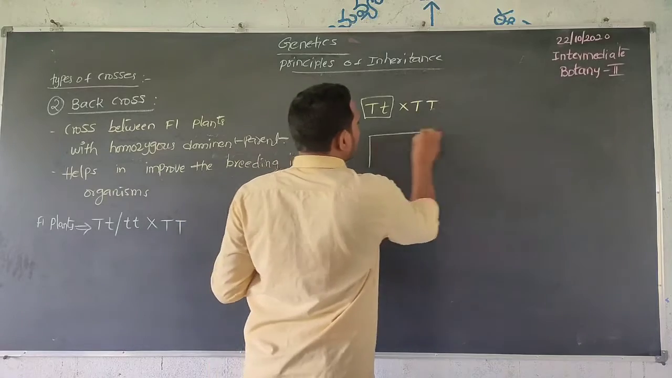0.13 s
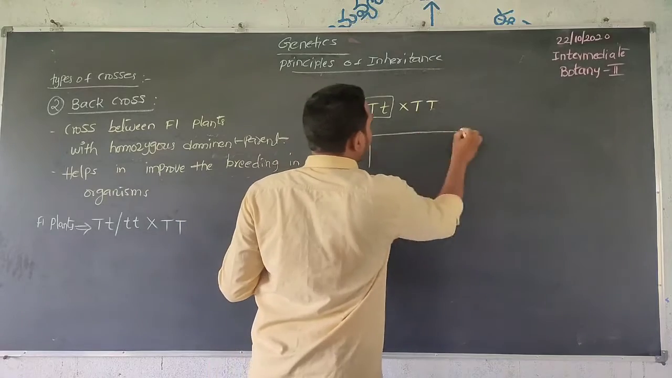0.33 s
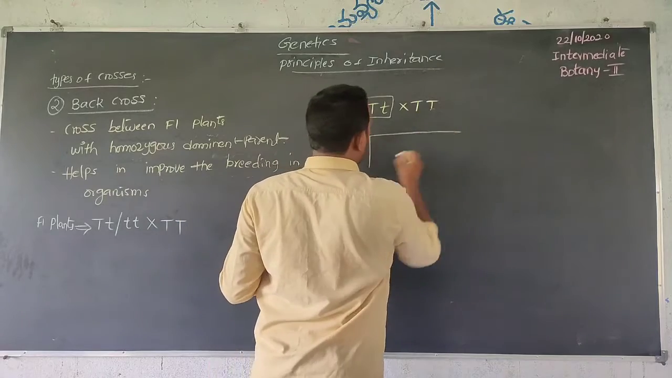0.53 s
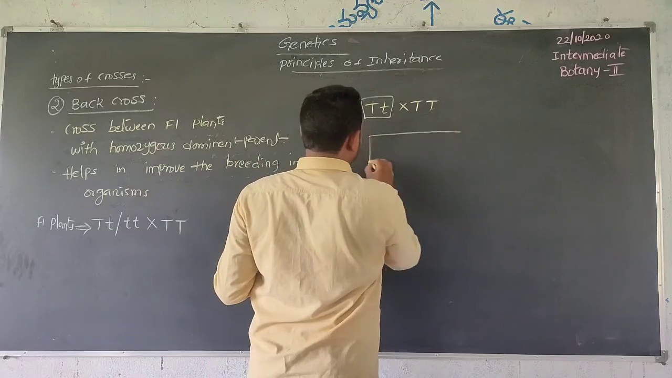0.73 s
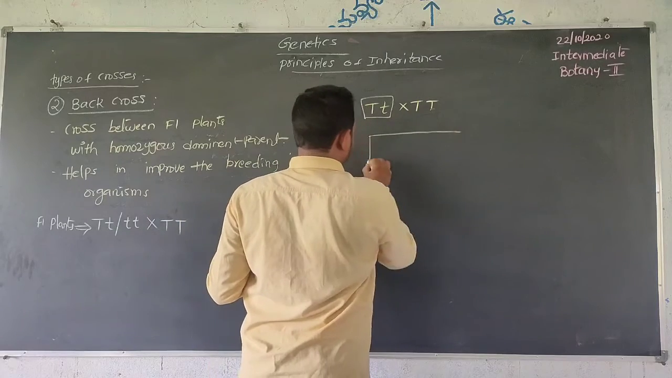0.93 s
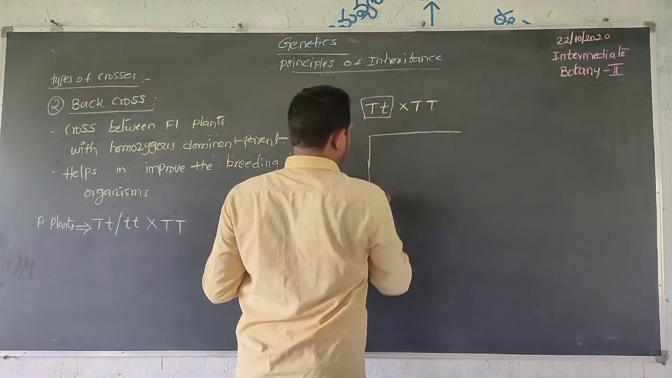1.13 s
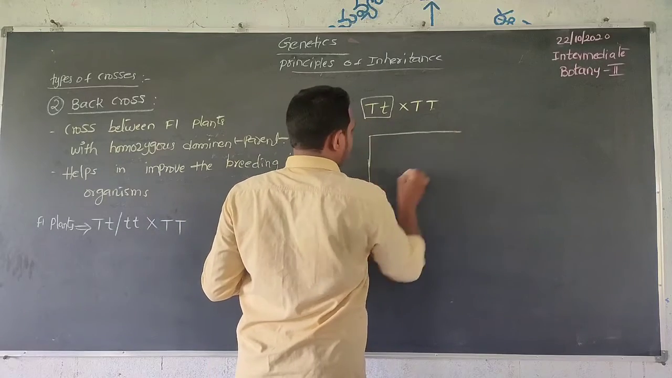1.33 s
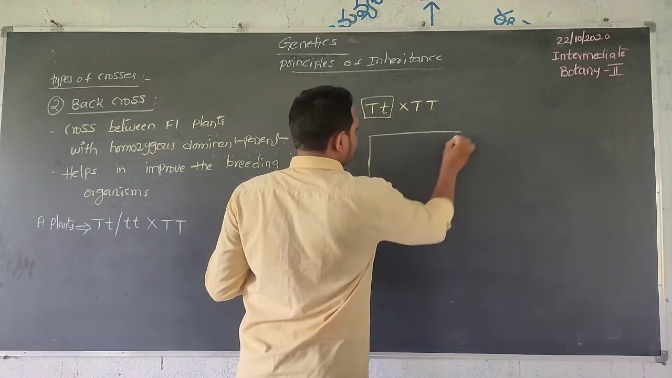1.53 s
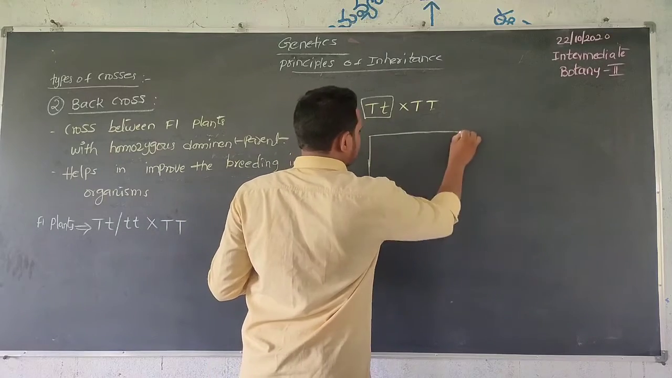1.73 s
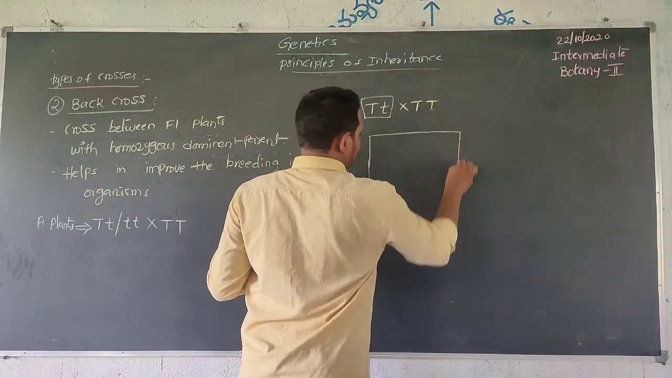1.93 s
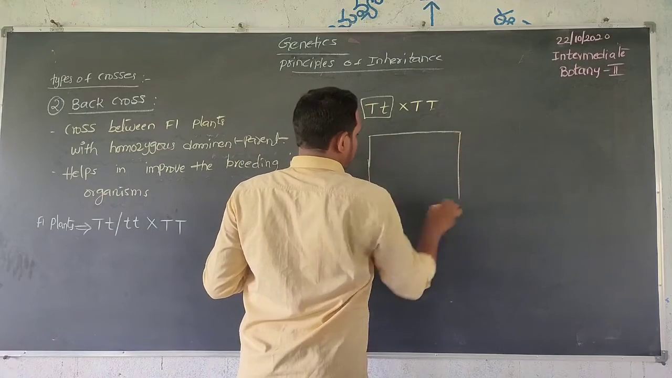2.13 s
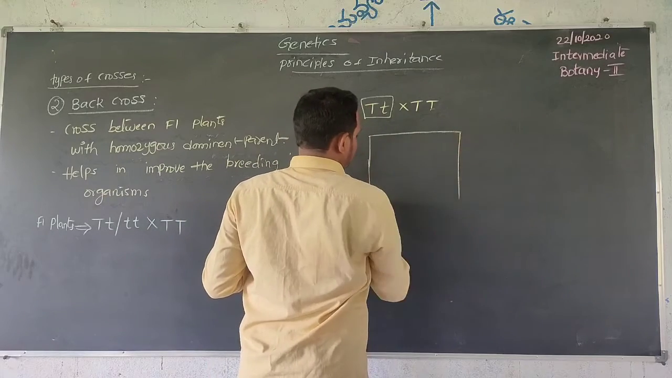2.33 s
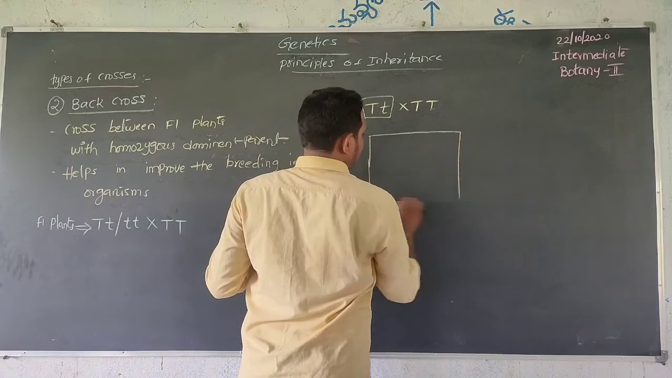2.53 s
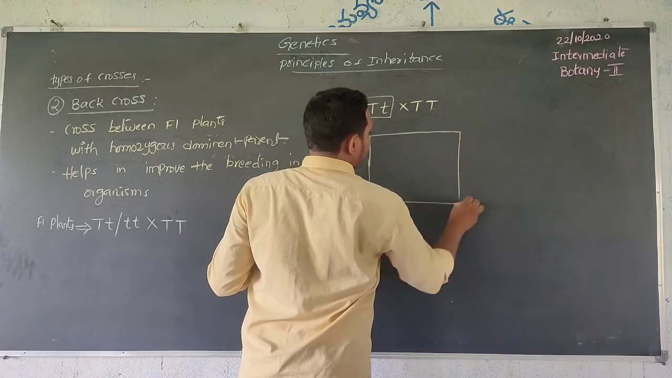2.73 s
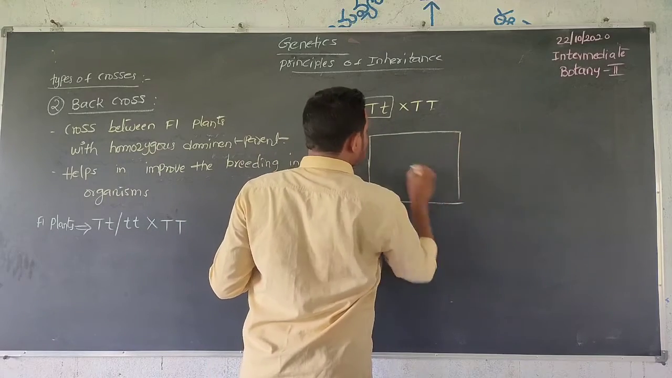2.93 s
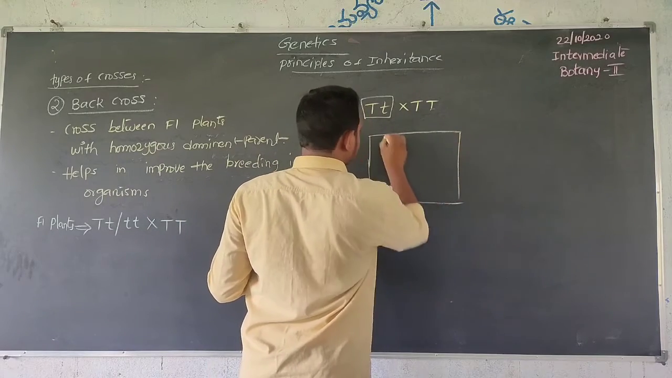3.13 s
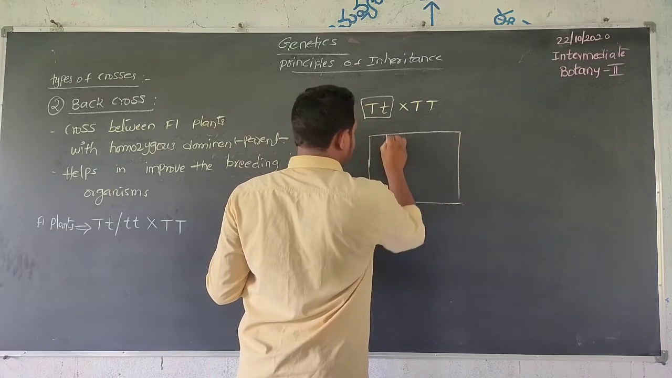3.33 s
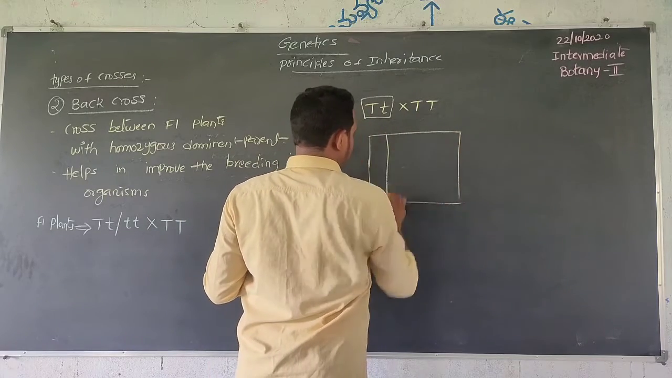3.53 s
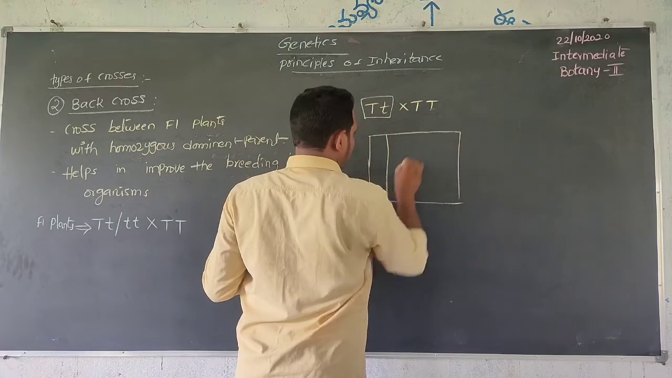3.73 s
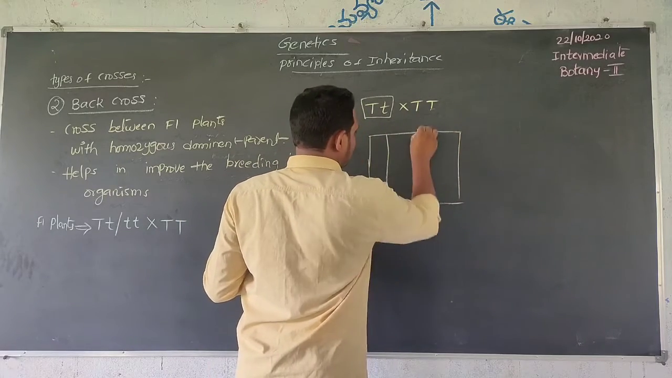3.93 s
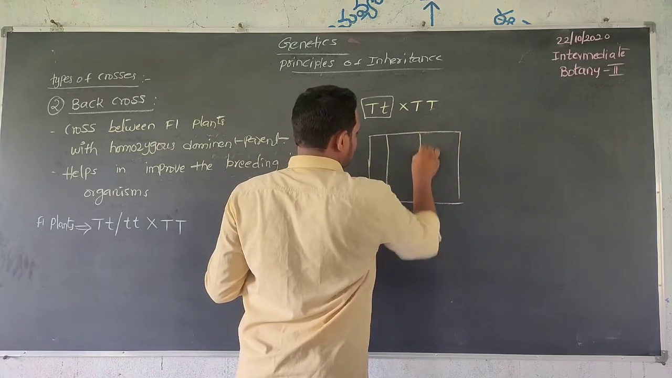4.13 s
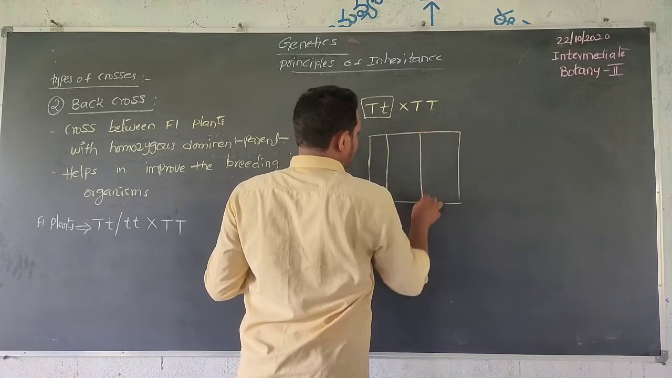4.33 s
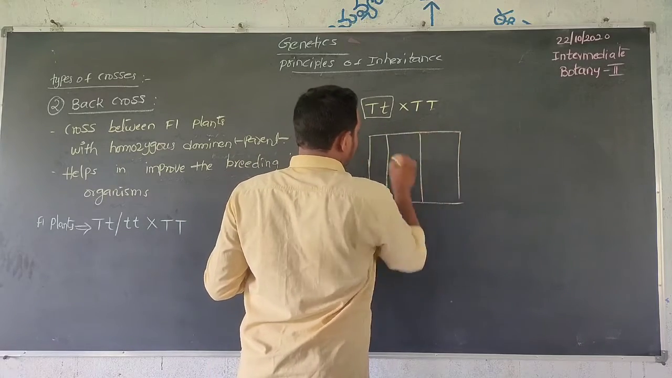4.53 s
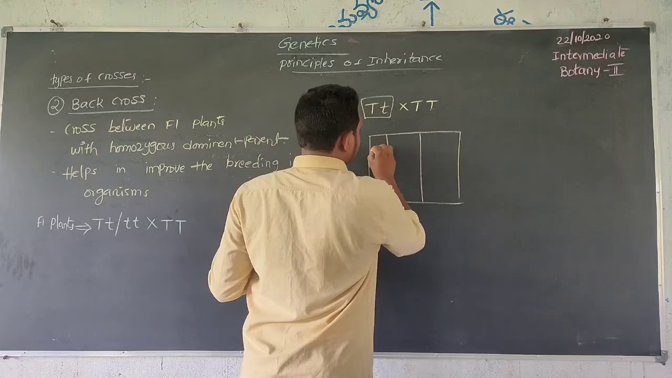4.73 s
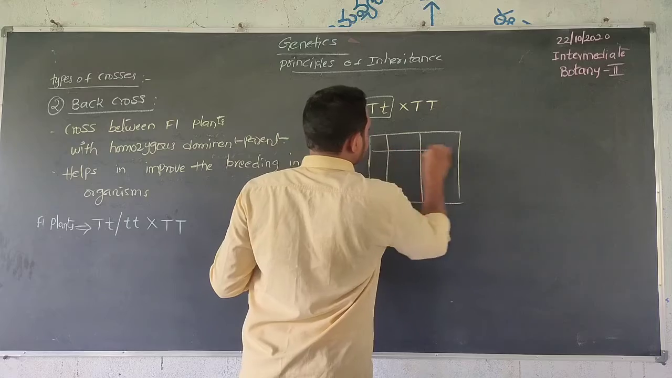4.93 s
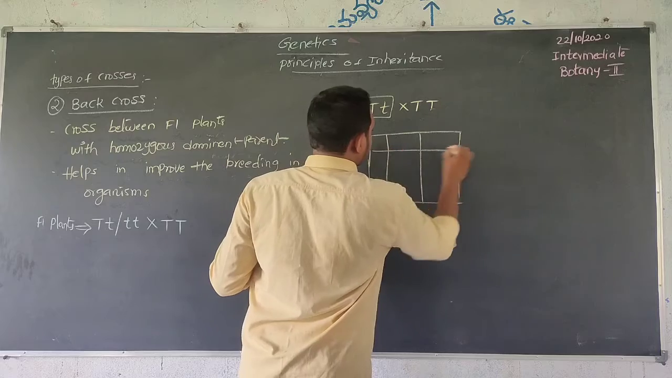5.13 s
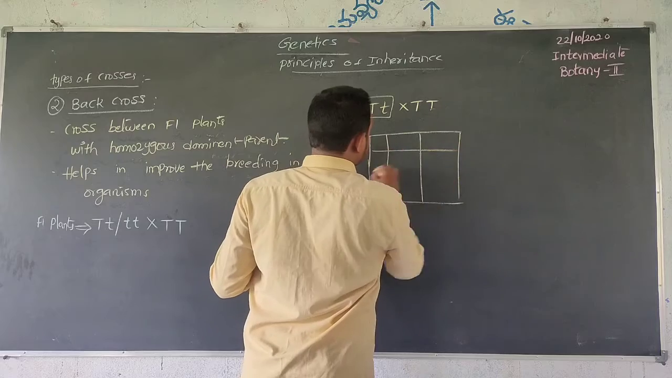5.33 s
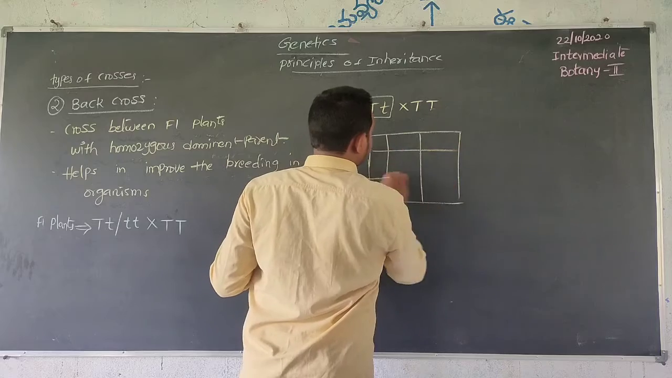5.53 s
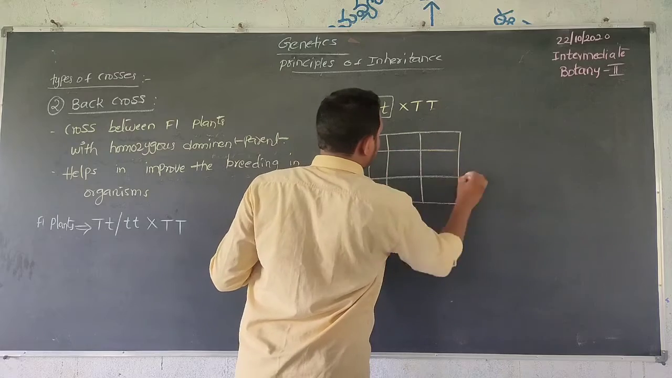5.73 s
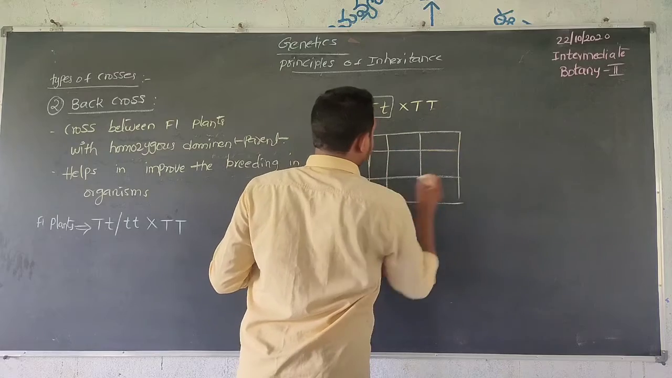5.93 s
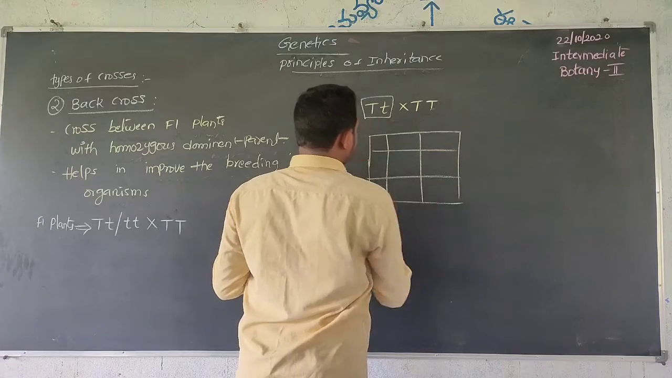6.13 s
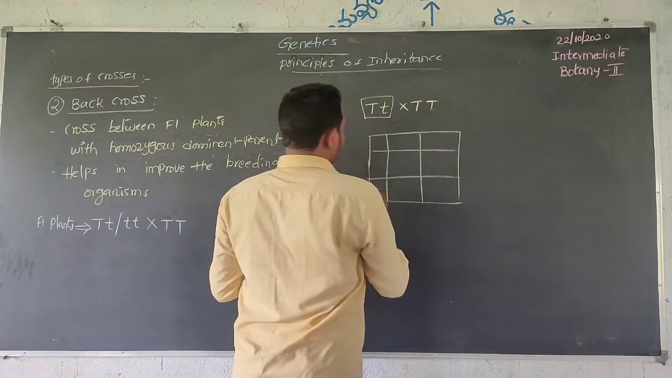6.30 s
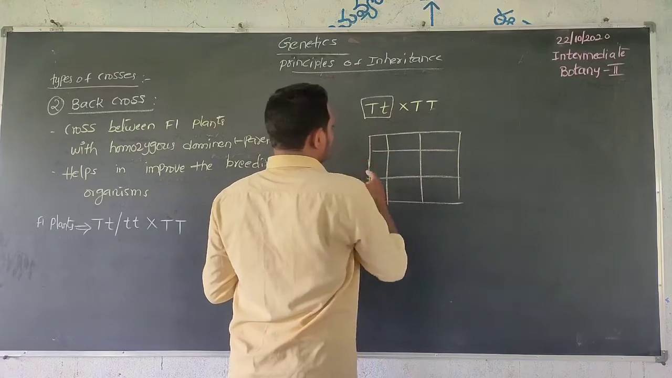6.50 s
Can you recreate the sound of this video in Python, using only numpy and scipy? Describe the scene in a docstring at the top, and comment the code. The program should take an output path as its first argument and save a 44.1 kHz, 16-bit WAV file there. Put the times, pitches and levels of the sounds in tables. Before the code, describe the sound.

In a bare, echoing classroom with a faint drone of distant traffic, a chalk stick taps a blackboard and scrapes along it, nine times with brief pauses between. The dry, dusty strokes ring slightly, shake the board and sometimes stutter into a rasp. Taps and scrapes grow louder after the first few, and the tip ends with a soft brush. It is all heard through a single microphone.

```python
"""A faint room ring of chalk fades at the very start. A chalk stick taps a wall blackboard and is dragged
along nine ruled lines, most set down with a tap. In each line its grit hisses, rings the stick at a
pitch that follows the grip and shakes the board; now and then the stick catches and judders. The later
lines are louder, and a light brush of the tip comes last. All along, a bare classroom echoes and far
traffic drones, heard by one microphone."""
import sys
import numpy as np
from scipy import signal
from scipy.fft import rfft, irfft, next_fast_len
from scipy.io import wavfile
from scipy.ndimage import uniform_filter1d, map_coordinates

SR = 44100
rng = np.random.default_rng(int(sys.argv[2]) if len(sys.argv) > 2 else 0)


def dump(signal):
    """Clip the signal to [-1, 1] and save it as 16-bit WAV at the path in sys.argv[1]."""
    limited = np.clip(np.atleast_2d(signal).T, -1, 1)
    pcm = np.round(limited * 32767).astype(np.int16)
    wavfile.write(sys.argv[1], SR, pcm)


N = 289457


def strokes():
    """Dragged chalk: one grit sounds as dust hiss, scrape and the stick's two rings; the board thrums."""
    # spectrum of the dust hiss: (frequency [Hz], level [dB])
    dust_eq = [(1500, -9), (3100, -0.5), (6500, -3), (8900, -7), (11000, 1), (13000, 0.5), (15700, -7.5)]
    # spectrum of the scrape through the board: (frequency [Hz], level [dB])
    scrape_eq = [(200, -26), (450, 9), (800, -9.5), (1440, 10), (2400, 5.5), (4000, -39)]

    def resonance(hz, s, name, trim_db, width_hz):
        centre_hz = control(name + "_hz", s, lifted_db=None)
        return amp(control(name, s) + trim_db) * hump(hz, centre_hz, width_hz)

    def tip_colour(hz, s):
        low_ring = resonance(hz, s, "low_ring", trim_db=-6.5, width_hz=1270)
        high_ring = resonance(hz, s, "high_ring", trim_db=-4.5, width_hz=2870)
        panel = resonance(hz, s, "scrape", trim_db=-7, width_hz=700)  # the patch of board under the tip
        sizzle = amp(control("sizzle", s)) * hump(hz, centre_hz=14850, width_hz=1500)
        return low_ring + high_ring + panel + sizzle

    t = np.arange(N) / SR
    crumbs = grit(spread_db=12.5, density=.03)
    hiss = coloured(crumbs, dust_eq) * amp(control("hiss", t))
    scrape = coloured(crumbs, scrape_eq) * amp(control("scrape", t) - 12)
    push = rng.standard_normal(N) * amp(control("thrum", t) + 14.5 + wobble(rate_hz=14, depth_db=3))
    tip = shaped(crumbs, tip_colour, patchy_db=2.5)
    rubbing = shaped(hiss + scrape, lambda hz, s: 1, patchy_db=3.3)
    unsteady_hand = amp(wobble(rate_hz=18, depth_db=1.5))
    return rubbing + tip * unsteady_hand + filtered(push, board)


def grit(spread_db, density):
    """Crumbs of chalk break off: steady rubbing with scattered, somewhat larger grains."""
    grains = (rng.random(N) < density) * amp(spread_db * rng.random(N))
    return unit((1 + grains) * rng.standard_normal(N))


def ruled_lines():
    """Breakpoints for each line: speed drives the hiss, pressure the scrape, grip the ring pitch."""
    # one gesture a line: (time [s], hiss [dB], relative scrape [dB], low ring pitch [Hz],
    # low ring offset from hiss [dB], high ring offset from hiss [dB])
    gestures = [
        [(0.15, -76, -65, 3470, 10, 8), (0.182, -66.5, -49, 4900, 6, 19), (0.24, -58, -40, 4800, 17, 15),
         (0.304, -56, -42.5, 4870, -1, 16.5), (0.394, -54.5, -43.5, 4800, -3, 16),
         (0.436, -52.5, -41, 3770, 12, 5), (0.508, -61, -50, 4700, -1, 17), (0.545, -68, -55, 4120, 14, 11)],
        [(1.11, -81, -40, 2850, 18, 8), (1.126, -66, -51, 2940, 13, 6), (1.186, -54.5, -59, 2800, 6, -4),
         (1.222, -50.5, -46, 3100, 5.5, -3), (1.346, -48.5, -58, 3060, 4, -3), (1.382, -50.5, -64, 3030, 9, -3),
         (1.41, -60, -52, 2840, 15, 1), (1.425, -70, -58, 2830, 15, 9)],
        [(1.657, -67, -51, 3940, 13, 12), (1.667, -56, -49, 4130, 6, 0), (1.691, -55.5, -40.5, 5000, 10, 9),
         (1.719, -60.5, -42, 5030, 2, 7), (1.757, -64, -43.5, 3940, 16, 7), (1.831, -74, -65, 4350, 13, -1),
         (1.885, -80, -64, 4160, 20, 2), (1.95, -91, -64, 4160, 16, 8)],
        [(1.99, -66, -66, 3960, 11, 1), (2.01, -65, -65, 3910, 18, 7), (2.044, -62, -60, 3800, 24, 6),
         (2.118, -57, -45, 4120, 13.5, 11.5), (2.184, -54, -49, 4430, 10, 13.5),
         (2.236, -53, -47.5, 4330, 8, 10), (2.276, -53.5, -36, 3720, 17.5, 12), (2.29, -72, -34, 3680, 18, 8)],
        [(2.645, -61, -36, 2700, 21, 3), (2.655, -56, -50, 2690, 10, -1), (2.695, -47, -50, 2950, 7, -9),
         (2.727, -47.5, -29, 3170, 11.5, 2), (2.789, -45.5, -32.5, 3660, -1, 7),
         (2.827, -47.5, -44.5, 3120, 18.5, 10), (2.951, -58, -45, 3730, 12, 15), (2.98, -73, -56, 3320, 18, 7)],
        [(3.49, -66, -40.5, 4100, 16, 11), (3.518, -61.5, -51, 5200, 7, 11), (3.602, -49, -46, 4800, 9.5, -13),
         (3.646, -52, -48, 4380, 4, 10), (3.73, -46, -49, 3080, 11.5, -0.5), (3.788, -52, -60, 3310, 10.5, 3),
         (3.822, -52, -44, 3660, 11, 5), (3.825, -69, -50, 3580, 10, 6)],
        [(4.23, -85, -50, 4730, 18, 17), (4.26, -63, -49, 4400, 9, 12), (4.368, -50, -51, 4300, 6, 2),
         (4.42, -48.5, -50, 3930, 15.5, 7), (4.472, -48, -45, 4400, 6.5, 6), (4.51, -52.5, -58, 3220, 12, 4),
         (4.534, -46.5, -47, 3270, 14, -3), (4.548, -63, -34.5, 3170, 15, 8)],
        [(4.99, -67, -44, 3300, 11, -1), (5.028, -54, -50, 4240, -3, 7), (5.058, -53, -33, 4330, 13, 5),
         (5.104, -47.5, -37, 4410, -4, 4), (5.144, -51.5, -39.5, 4600, 14, 9),
         (5.216, -49.5, -45, 3840, -6, 13), (5.258, -63.5, -45, 3980, 23, 20), (5.27, -51, -47, 3920, 9, 2)],
        [(5.675, -59, -31, 2700, 10, 1), (5.691, -53, -44, 2800, 0, -6), (5.755, -42.5, -42, 2700, 15, -11),
         (5.789, -44.5, -33, 3620, 2, 0), (5.825, -41.5, -36, 4370, 2, 4.5),
         (5.895, -51.5, -36, 3980, 11.5, 15.5), (5.941, -54, -40.5, 3870, 1, 15),
         (5.96, -68, -39, 4020, 15, 10)],
    ]
    # how the stick is held for each line:
    # (starting sizzle offset from hiss [dB], relative thrum [dB], scrape centre [Hz], high ring [Hz])
    grips = [(8, -39.5, 1300, 6000), (-5, -40.5, 400, 6000), (-10, -41.5, 680, 6200),
             (-5, -40.5, 1100, 6360), (3, -38.5, 1220, 5700), (-6, -42, 910, 6400), (-9, -41.5, 880, 5900),
             (4, -39, 1300, 5900), (0, -40.5, 720, 5450)]
    sizzle_db_per_s = -21  # the finest powder comes early in a line
    return [[dict(time=s, hiss=hiss, low_ring=hiss + low, low_ring_hz=low_hz,
                  high_ring=hiss + high, high_ring_hz=high_hz, scrape=scrape, scrape_hz=scrape_hz,
                  thrum=thrum, sizzle=hiss + sizzle + sizzle_db_per_s * (s - gesture[0][0]))
             for s, hiss, scrape, low_hz, low, high in gesture]
            for gesture, (sizzle, thrum, scrape_hz, high_hz) in zip(gestures, grips)]


def faint_chalk():
    """Breakpoints for the fading room ring at the very start and the later light brushes of the tip."""
    # the room ring, then the brushes: (time [s], length [s], hiss [dB], relative ring [dB],
    # ring pitch [Hz], relative scrape [dB], relative thrum [dB])
    sounds = [(0, 0.12, -72, -53.5, 2400, -50, -46.5), (0.792, 0.044, -51.5, -56, 3820, -54.5, -43),
              (0.906, .14, -66, -85, 3800, -77, -76), (1.455, 0.032, -67, -45, 3280, -60, -46),
              (6.392, 0.36, -72, -52.5, 3240, -52, -53)]
    swell = [(0, -7), (.15, 0), (1, -3)]  # (share of the length, level [dB])
    return [[dict(time=s + share * length, hiss=hiss + db, low_ring=ring + db, low_ring_hz=ring_hz,
                  high_ring=ring - 8 + db, high_ring_hz=6300, scrape=scrape + db, scrape_hz=790,
                  thrum=thrum + db, sizzle=hiss - 30 + db)
             for share, db in swell]
            for s, length, hiss, ring, ring_hz, scrape, thrum in sounds]


def control(name, t, lifted_db=-110):
    """One automation lane through the lines and faint sounds; in gaps it rests at lifted_db, if given."""
    lift_s = .004  # each sound opens and closes this fast
    lane = []
    for event in sorted(ruled_lines() + faint_chalk(), key=lambda e: e[0]["time"]):
        points = [(point["time"], point[name]) for point in event]
        if lifted_db is not None:
            points = [(points[0][0] - lift_s, lifted_db), *points, (points[-1][0] + lift_s, lifted_db)]
        lane += points
    return np.interp(t, *np.transpose(lane))


def taps():
    """A half-sine push clicks and cracks, rings the stick for a moment and booms in board and wall."""
    # the tip meets the board: (time [s], relative level [dB], contact [ms], stick ring [Hz],
    # ring offset [dB], boom offset [dB], crack offset [dB])
    hits = [(0.0185, -31.5, 0.61, 4500, 7.5, 8.5, -31), (0.2358, -24.5, 0.39, 4650, 10, -5, -23),
            (0.3827, -20, 0.32, 5100, 7, -8, -26), (0.385, -27.5, 0.27, 5740, 15, -12, -23),
            (1.0644, -19.5, 0.53, 2000, 9, 9.5, -22), (1.854, -31, 1.16, 6100, -1, -1.5, -19),
            (1.879, -34.5, 1.2, 4500, -16, 7.5, -24), (2.277, -26.5, 0.58, 3580, -13, 0, -24),
            (2.6, -31.5, 1.55, 2450, -22, 3.5, -24), (2.62, -8, 0.61, 2620, 4.5, -1, -28),
            (3.117, -46, 0.35, 5960, -6, -14, -10), (3.4331, -7.5, 0.585, 5200, -8, -1.5, -39),
            (4.2047, -11, 0.6, 4970, 2, 0, -49), (4.5234, -45, 0.26, 3200, -3, -22, -22),
            (4.966, -5.5, 0.49, 4230, -4, -3, -34), (5.6506, -9, 0.82, 2340, -5, -1.5, -27.5)]
    ring_t60_s, crack_t60_s = .0028, .016  # the fingers damp the stick at once
    click, force, crack = np.zeros((3, N + SR))
    t = np.arange(SR // 50) / SR
    for s, db, contact_ms, ring_hz, ring_db, boom_db, crack_db in hits:
        span = slice(round(s * SR), round(s * SR) + len(t))
        push = np.sin(np.pi * np.clip(1000 * t / contact_ms, 0, 1)) ** 1.08
        ring = amp(ring_db - 60 * t / ring_t60_s) * np.sin(2 * np.pi * ring_hz * t)
        click[span] += amp(db) * (push + ring)
        crack[span] += amp(db + crack_db - 60 * t / crack_t60_s) * rng.standard_normal(len(t))
        force[span] += amp(db + boom_db + 8.5) * push
    # a small, soft contact: little bass or top
    soft_click = filtered(click[:N], lambda f: 1j * f / (600 + 1j * f) / (1 + 1j * f / 6000) ** 2)
    wall = lambda f: mode(f, centre_hz=102.6, width_hz=22, db=-12.5)
    boom = filtered(force[:N], lambda f: board(f) + wall(f))
    return soft_click + crack[:N] + boom


def board(hz):
    """The blackboard's response, a sum of resonances; below the lowest it hardly radiates."""
    # board modes: (frequency [Hz], width [Hz], level [dB])
    modes = [(204.7, 23.4, 5), (225.6, 40, -6), (290.5, 27.6, -2), (320, 16, -25), (402, 17, -13),
             (519, 72, -18.5), (640, 42, -8.5), (770, 110, -13), (1050, 22, -48), (1320, 29, -18),
             (1452, 39, -15)]
    return sum(mode(hz, *row) for row in modes) * 1j * hz / (85 + 1j * hz)


def judders():
    """The stick catches and judders briefly: short rasps of noise, each at one pitch."""
    # catches of the stick: (time [s], length [s], pitch [Hz], width [Hz], level [dB])
    catches = [(0.226, 0.044, 4250, 900, -57), (1.248, 0.034, 2850, 600, -44.5),
               (1.66, 0.021, 3830, 492, -50), (5.002, 0.13, 6500, 688, -46), (1.26, .04, 7460, 600, -52),
               (2.698, 0.046, 1000, 504, -34), (2.747, 0.015, 3670, 500, -37),
               (2.832, 0.014, 3070, 300, -34), (2.859, 0.031, 3120, 250, -37.5),
               (3.644, 0.042, 4040, 700, -47), (3.714, 0.031, 2250, 400, -45.5),
               (4.513, .027, 3150, 708, -42), (5.042, 0.03, 4250, 600, -41), (5.066, 0.027, 4960, 500, -44),
               (5.122, 0.044, 4730, 805, -41), (5.232, 0.021, 4000, 1200, -43.5),
               (5.738, 0.031, 2060, 300, -35), (5.794, 0.016, 3880, 600, -32.5),
               (5.854, 0.0093, 3570, 700, -33), (5.889, 0.0067, 3440, 900, -36)]
    return bursts([(s, length, hz, hz, width, db) for s, length, hz, width, db in catches], fade=.23)


def whispers():
    """Faint, narrow hisses drift between and under the lines."""
    # thin hisses: (time [s], length [s], start pitch [Hz], end pitch [Hz], width [Hz], level [dB])
    hisses = [(.83, 0.084, 3700, 3760, 500, -64), (.88, 0.32, 6100, 5900, 306, -72),
              (1.41, 0.38, 6450, 6300, 250, -59.5), (1.7, 0.52, 5200, 5070, 900, -62.5),
              (1.76, 0.39, 3800, 3800, 700, -62), (3.1, 0.32, 5800, 5870, 400, -68),
              (4.855, .05, 3730, 3900, 1200, -66), (4.875, 0.071, 4600, 5200, 300, -61),
              (6.38, 0.19, 6700, 6800, 610, -68)]
    return bursts(hisses, fade=.35)


def wall_echoes(x):
    """Near walls answer first; their uneven surfaces smear each echo."""
    # early reflections: (delay [s], level [dB])
    reflections = [(.0045, -11), (.007, -10.5), (0.0123, -18.5), (0.013, -47.5), (0.019, -17.5),
                   (.022, -28), (.028, -42), (0.035, -28), (0.103, -22)]
    echoes = sum(amp(db) * np.pad(x, (round(s * SR), 0))[:N] for s, db in reflections)
    smear = amp(-60 * np.arange(200) / SR / .0082) * rng.standard_normal(200)
    smeared = signal.fftconvolve(echoes, smear / np.linalg.norm(smear))[:N]
    return filtered(smeared, lambda f: 1 / (1 + 1j * f / 5000))


def classroom_tail(x):
    """The bare room rings on, each frequency dying at its own speed; a fresh tail every quarter second."""
    # reverberation: (frequency [Hz], decay to -60 dB [s], tail energy [dB])
    bands = [(99.5, 0.29, -25.5), (206, 2.02, 7.5), (520, 1.58, -3), (2070, 1.6, -5), (4900, 0.96, -9.5),
             (8100, 0.76, -7), (11000, 0.92, -11), (16000, .6, -21)]
    step, build_up_s = SR // 4, .0049
    hz, t, noise = signal.stft(rng.standard_normal((N // step + 1, SR * 5 // 4)), SR, nperseg=256)
    t60 = along([(f, seconds) for f, seconds, _ in bands], hz)[:, None]
    energy_db = along([(f, db) for f, _, db in bands], hz)[:, None]
    decay = amp(energy_db - 10 * np.log10(t60) - 60 * t / t60)
    tails = signal.istft(noise * decay, SR, nperseg=256)[1] * np.sqrt(6 * np.log(10) / SR)
    tails *= 1 - np.exp(-np.arange(tails.shape[1]) / SR / build_up_s)
    reverb = np.zeros(N + 3 * SR)
    for k, tail in enumerate(tails):
        wet = signal.fftconvolve(x[k * step:(k + 1) * step], tail)
        reverb[k * step:][:len(wet)] += wet
    return reverb[:N]


def room_tone():
    """A gently uneven bed of building and street air; far traffic swells and sinks."""
    # spectrum of the room's air: (frequency [Hz], level [dB])
    air_eq = [(24, -7), (34, -14), (45, -40), (80, -53), (130, -2.5), (207, -1), (253, -6.5), (328, -6),
              (501, -9), (735, -10.5), (2510, -20), (4150, -13.5), (13100, -32), (16000, -31)]
    # swells of the far traffic's drone: (time [s], level [dB])
    swells = [(0, -61.5), (.6, -71), (1.9, -66.5), (2.3, -70), (2.5, -63), (3.1, -62), (3.6, -77),
              (4.05, -62), (4.3, -73), (4.8, -64.5), (5.2, -70), (6.05, -74), (6.56, -54)]
    air = amp(-57) * coloured(rng.standard_normal(N), air_eq)
    drone = unit(filtered(rng.standard_normal(N), lambda f: hump(f, centre_hz=98, width_hz=30)))
    rumble = unit(filtered(rng.standard_normal(N), lambda f: hump(f, centre_hz=57, width_hz=29)))
    drone *= amp(np.interp(np.arange(N) / SR, *np.transpose(swells)))
    rumble *= amp(-70 + wobble(rate_hz=2.4, depth_db=1.3))
    return shaped(air, lambda hz, s: 1, patchy_db=.5) + drone + rumble


def bursts(rows, fade):
    """Short bands of noise gliding between two pitches; each edge takes the share fade of the length."""
    def gain(hz, t):
        total = 0
        for s, length, start_hz, end_hz, width_hz, db in rows:
            progress = (t - s) / length
            gate = np.clip(np.minimum(progress, 1 - progress) / fade + .5, 0, 1)
            centre_hz = start_hz + (end_hz - start_hz) * np.clip(progress, 0, 1)
            total += gate * amp(db) * hump(hz, centre_hz, width_hz, order=4)
        return total
    return shaped(rng.standard_normal(N), gain, patchy_db=1.5)


def shaped(x, gain, patchy_db):
    """x through a moving EQ, gain(Hz, s), mottled with random louder and softer patches."""
    hz, t, spectra = signal.stft(x, SR, nperseg=256)
    patches = uniform_filter1d(rng.standard_normal(spectra.shape), 5, axis=0)
    patches = unit(uniform_filter1d(patches, 9, axis=1))
    return signal.istft(spectra * gain(hz[:, None], t) * amp(patchy_db * patches), SR, nperseg=256)[1][:N]


def filtered(x, response):
    """x through a complex frequency response."""
    size = next_fast_len(N + SR // 2)
    return irfft(rfft(x, size) * response(np.fft.rfftfreq(size, 1 / SR)), size)[..., :N]


def coloured(x, eq):
    """x through an EQ curve, brought to unit RMS."""
    return unit(filtered(x, lambda f: amp(along(eq, f))))


def mode(hz, centre_hz, width_hz, db):
    """The causal response of one ringing mode."""
    return amp(db) * 1j * hz * width_hz / (centre_hz ** 2 - hz ** 2 + 1j * hz * width_hz)


def hump(hz, centre_hz, width_hz, order=2):
    """A resonance that passes about unit power of white noise."""
    return np.sqrt(SR / np.pi / width_hz * 2) / (1 + (2 * (hz - centre_hz) / width_hz) ** order)


def wobble(rate_hz, depth_db):
    """A smooth random level drift in dB."""
    knots = rng.standard_normal(int(N * rate_hz / SR) + 4)
    return depth_db * map_coordinates(knots, [np.arange(N) * rate_hz / SR])


def along(points, hz):
    """A curve through (frequency [Hz], value) points on a log axis."""
    frequencies, values = np.transpose(points)
    return np.interp(np.log(hz + 1), np.log(frequencies + 1), values)


def amp(db):
    return 10 ** (np.asarray(db) / 20)


def unit(x):
    return x / np.sqrt(np.mean(x ** 2) + 1e-20)


def scene():
    """Chalk, its echoes and the room tone: one microphone on both channels."""
    chalk = strokes() + taps() + judders() + whispers()
    return np.tile(chalk + classroom_tail(chalk) + wall_echoes(chalk) + room_tone(), (2, 1))


def record(dry):
    """The microphone passes nothing above its band limit."""
    return filtered(dry, lambda hz: hz < 15750)


dry = scene()
out = record(dry)
dump(out)
```